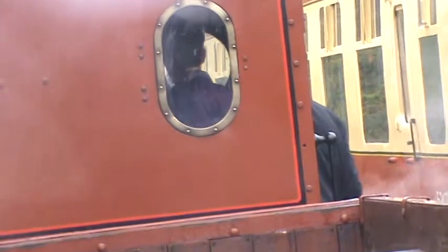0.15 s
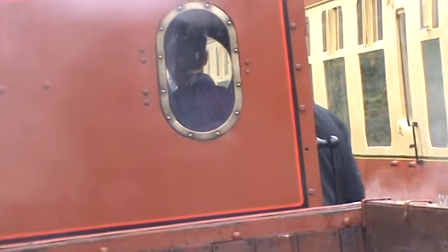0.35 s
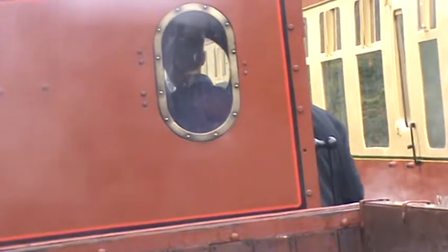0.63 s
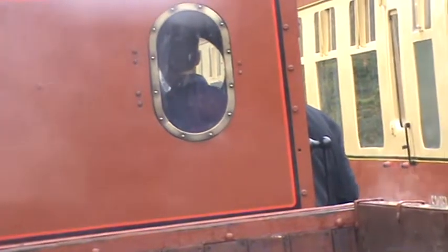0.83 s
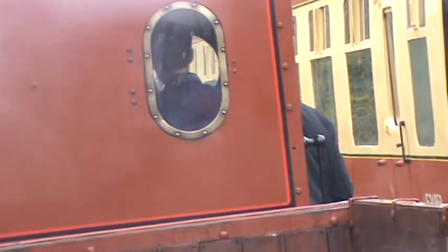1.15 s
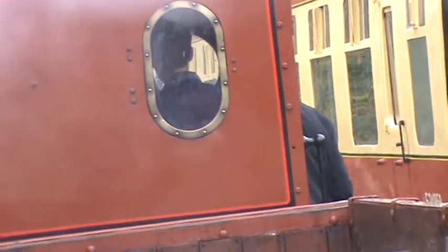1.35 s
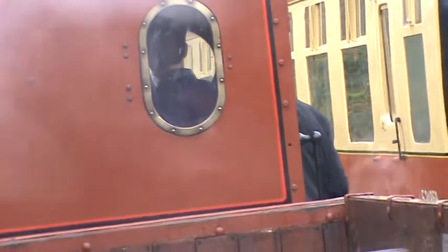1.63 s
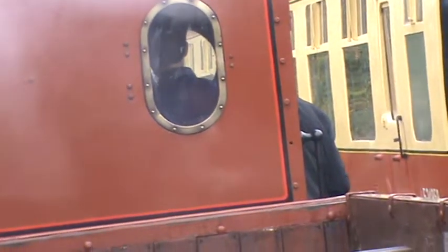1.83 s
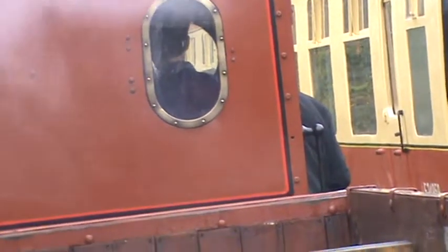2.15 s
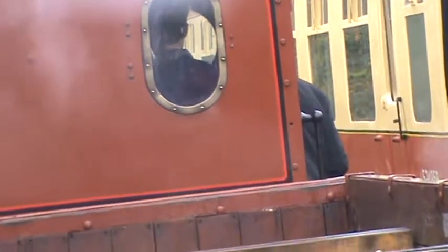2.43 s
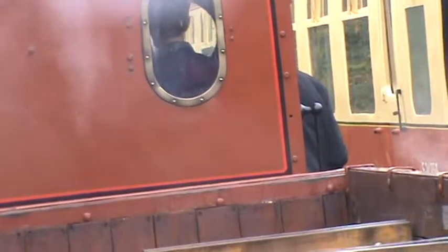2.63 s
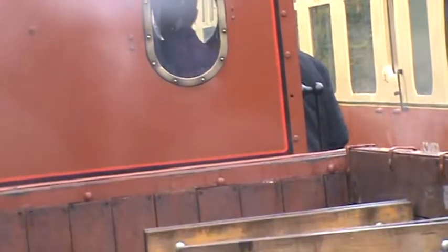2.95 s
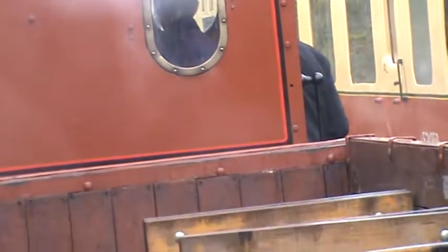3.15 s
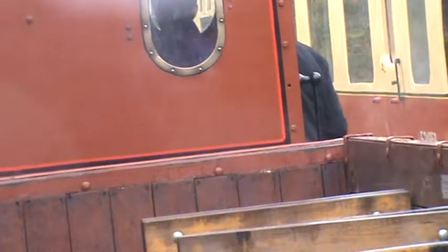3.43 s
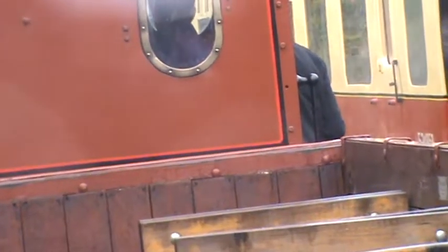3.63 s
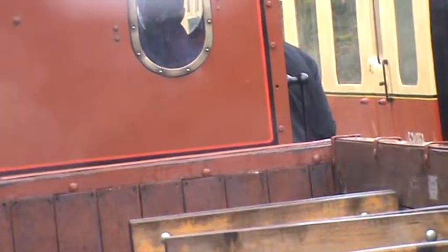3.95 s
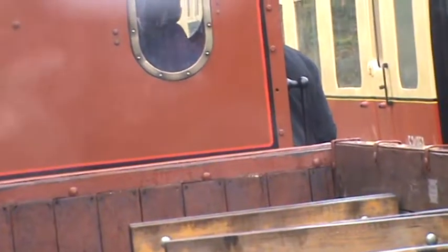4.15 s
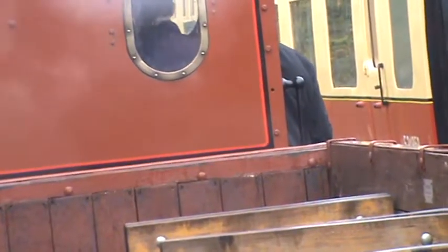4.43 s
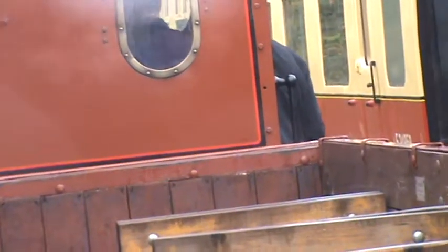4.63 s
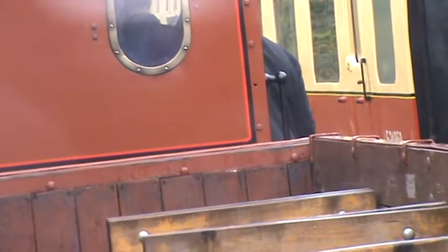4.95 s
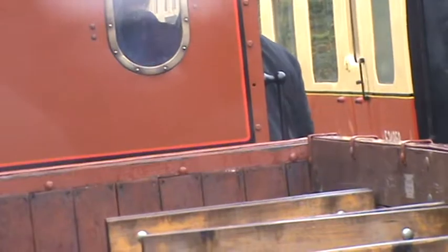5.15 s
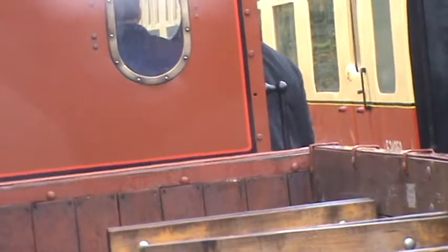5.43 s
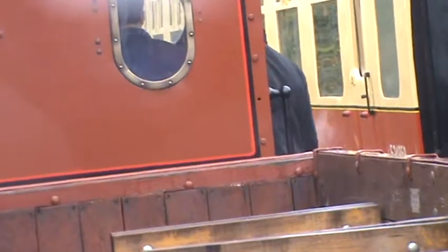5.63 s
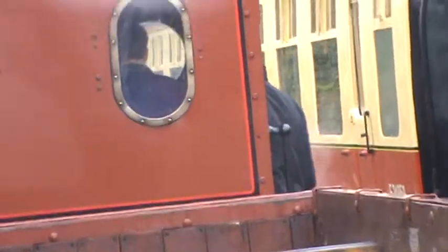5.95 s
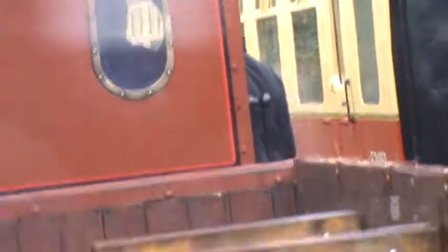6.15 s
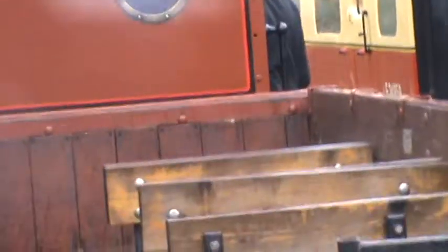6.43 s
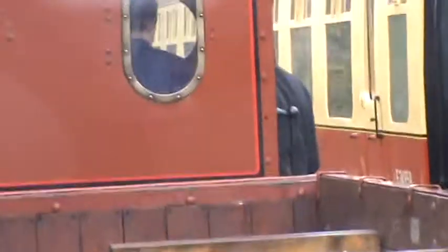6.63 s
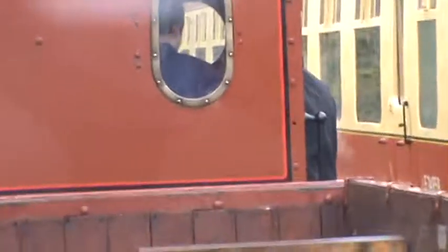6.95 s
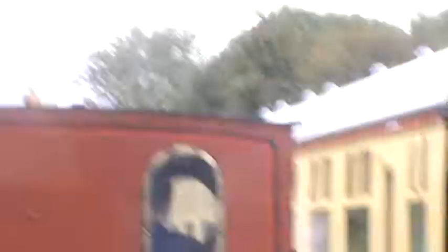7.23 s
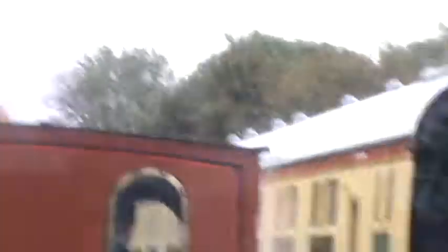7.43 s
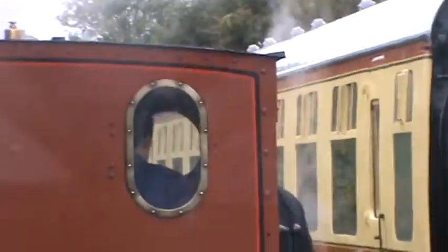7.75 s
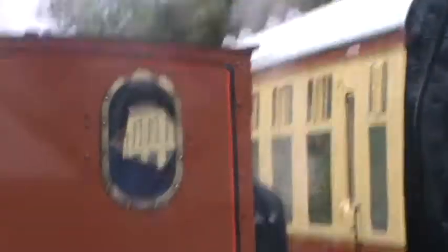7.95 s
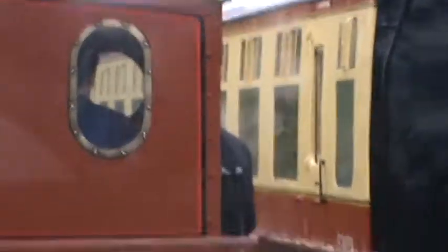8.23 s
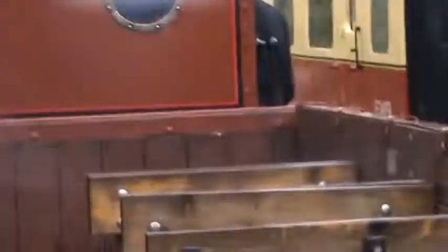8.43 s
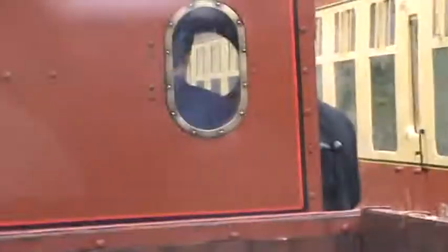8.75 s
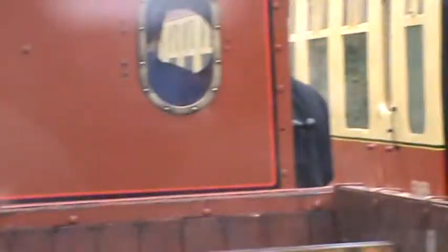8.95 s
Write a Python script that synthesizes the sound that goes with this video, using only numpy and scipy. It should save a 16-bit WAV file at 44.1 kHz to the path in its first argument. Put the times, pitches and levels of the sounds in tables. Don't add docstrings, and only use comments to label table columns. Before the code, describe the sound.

A locomotive blows off steam very close to a hand-held stereo microphone outdoors on a platform. The dense, bright hiss holds from start to end, ringing metallically, with fuzzy high whistling in brief flares. A faint low drone swells underneath. Dull knocks come early on, then again in the later part, the strongest just past seven seconds.

```python
import sys
import numpy as np
from scipy import signal
from scipy.fft import rfft, irfft, next_fast_len
from scipy.io import wavfile
from scipy.ndimage import uniform_filter1d

SR = 44100
rng = np.random.default_rng(int(sys.argv[2]) if len(sys.argv) > 2 else 0)


def voltage_ratio(level):
    return 10 ** (np.asarray(level, float) / 20)


def unload_wav(signal):
    wavfile.write(
        sys.argv[1],
        SR,
        np.round(np.clip(np.atleast_2d(signal).T, -1, 1) * 32767).astype(np.int16),
    )


N = 400869


def evened(x):
    return x / np.sqrt(np.mean(x ** 2) + 1e-20)


def read(points, hz):
    f, value = np.transpose(points)
    return np.interp(np.log(hz + 1), np.log(f + 1), value)


def centred(db):
    return voltage_ratio(db - db.mean())


def resonate(x, hz, width_hz):
    turn = np.exp(2j * np.pi * np.cumsum(hz * np.ones(len(x))) / SR)
    decay = np.exp(-np.pi * width_hz / SR)
    return turn * signal.lfilter([1 - decay], [1, -decay], x / turn)


def narrow_noise(noise, hz, width_hz):
    return resonate(resonate(noise, hz, width_hz), hz, width_hz)


def steadied(z, share):
    return z / (abs(z) + 0.13 * np.std(z)) ** share


def ring_power(modes, hz):
    return sum(voltage_ratio(db) ** 2 / (1 + (2 * (hz - f) / width) ** 2) ** 2 for f, width, db in modes)


# start_s, jet_db, facing_db
JET = [(0, -21.5, -5.5), (.3, -20.5, -3.5), (.75, -20.5, -3.5), (1.25, -21, -4.5), (1.8, -21, -2.5),
       (2.4, -20.5, -3.5), (2.8, -21.5, -3.5), (3.55, -21.5, -4.5), (4.1, -20.5, -3), (4.75, -21, -5),
       (5.1, -22, -2.5), (5.45, -21, -5), (6.0, -21.5, -3), (6.35, -21, -5), (6.9, -21.5, -8.5),
       (7.2, -21, -7.5), (7.5, -20.5, -8.5), (9.09, -21, -6)]
# pitch_hz, level_db (per Hz)
BROAD = [(25, -26), (60, -14.5), (120, -15.5), (220, -15), (400, -34.5), (700, -23.5), (1150, -16.5),
         (1900, -13), (3200, -7.5), (5400, -11.5), (7500, -12.5), (10500, -14.5), (13000, -19),
         (15700, -30)]
# pitch_hz, width_hz, level_db (per Hz at the top)
PIPE = [(326.3, 23.3, -14), (514.4, 9.9, -14), (486, 215, -22.5), (613, 87, -21.5), (796, 27, -7),
        (848.6, 21, -5), (910.4, 24, -6), (940, 100, -13), (1025, 14, -2.5), (1242, 130, -13.5),
        (1466, 85, -4.5), (1544, 18, -9.5), (1578, 344, -9), (1690, 14, -6.5), (1769, 33, -8)]
# pitch_hz, width_hz, level_db (per Hz at the top)
PLATING = [(2018, 94, -7.5), (2134, 30, -4), (2270, 20, -4.5), (2463, 176, -3.5), (2530, 46, -2.5),
           (2606, 41, -1), (2737, 118, -1.5), (2904, 35, -2.5), (3000, 43, -4), (3443, 110, -7),
           (3640, 150, -4.5), (3770, 170, -15), (4090, 660, -7.5), (4080, 70, -2.5), (4540, 36, -15),
           (4540, 780, -6), (4730, 32, -3), (4890, 310, -8), (5097, 420, -10.5), (5770, 109, -20),
           (5960, 322, -16.5)]
# pitch_hz, share
RING_SHARE = [(1300, -0.32), (1470, 0.44), (1650, 0.053), (1900, -0.24), (2300, -0.62), (2450, 1),
              (2800, 0.71), (3000, 0.16), (3200, -0.27), (3550, 0.018), (3850, 0.39), (4100, -0.02)]


def steam_power(t, hz):
    fizz_lag, pipe_lag = 0.86, 1
    fizz_start_db, fizz_build_s = -1.5, 1.6
    pipe_facing = 0.2
    start_s, jet_db, facing_db = np.transpose(JET)
    jet = centred(np.interp(t, start_s, jet_db))
    facing = centred(np.interp(t, start_s, facing_db))
    fizz = centred(fizz_start_db * np.exp(-t / fizz_build_s)) / jet ** fizz_lag
    pipe = facing ** pipe_facing / jet ** pipe_lag
    fizz_share = np.clip((hz - 5000) / 1500, 0, 1)
    broad = voltage_ratio(read(BROAD, hz)) ** 2 * fizz ** (2 * fizz_share)
    power = broad + ring_power(PLATING, hz) + ring_power(PIPE, hz) * pipe ** 2
    power = power * facing ** (2 * read(RING_SHARE, hz))
    return power * jet ** (2 * np.clip(hz / 900, 0, 1))


def standing_waves(frames, bins):
    depth_db = 1.5
    ripple = rng.standard_normal((frames, bins)).T
    ripple = uniform_filter1d(ripple, size=3, axis=0)
    ripple = evened(uniform_filter1d(ripple, size=60, axis=1))
    ripple = ripple - ripple.mean(axis=1, keepdims=True)
    return voltage_ratio(2 * depth_db * ripple)


# pitch_hz, likeness (0-1)
SAME = [(30, .6), (70, .8), (130, .98), (450, .95), (1500, .95), (3000, .94), (4500, .9), (7000, .82),
        (10000, .76), (12500, .79), (14500, .6)]
# pitch_hz, lead_rad
LEAD = [(30, 0.21), (70, 0.35), (130, 0.66), (250, 1.23), (450, 1.37), (900, 1.26), (1500, 1), (2500, 0.59),
        (4500, 0.47), (7000, 0.32), (10000, 0.13), (12500, 0.19), (14500, 0.74), (15600, 0.18)]


def hiss():
    size, hop = 4096, 1024
    frames, bins = N // hop + 5, size // 2 + 1
    hz = np.fft.rfftfreq(size, 1 / SR)[:, None]
    power = steam_power(np.arange(frames) * hop / SR, hz) * standing_waves(frames, bins)
    a, b, c, d = rng.standard_normal((frames, bins, 4)).T
    left, other = a + 1j * b, c + 1j * d
    same = np.clip(read(SAME, hz), 0, 1)
    right = same * left + np.sqrt(1 - same ** 2) * other
    summed = (1 + same * np.cos(read(LEAD, hz))) / 2
    z = np.array([left, right]) * np.sqrt(power / summed)
    return evened(signal.istft(z, nperseg=size, noverlap=size - hop)[1][:, :N])


def turbulence(x, patchy_db=0.5, flutter_db=0.56):
    hz, t, z = signal.stft(x, SR, nperseg=512, noverlap=384)
    patches = rng.standard_normal((len(t), len(hz))).T
    patches = uniform_filter1d(patches, size=7, axis=0)
    patches = evened(uniform_filter1d(patches, size=24, axis=1))
    rates_hz = np.geomspace(5, 40, num=40)
    flutter = evened(sum(np.sin(2 * np.pi * (f * t + rng.random())) for f in rates_hz))
    above_bass = np.clip(hz / 1500, 0, 1)[:, None]
    treble = np.clip((hz - 3500) / 6000, 0, 1)[:, None]
    z = z * voltage_ratio(patchy_db * patches * above_bass + flutter_db * treble * flutter)
    return signal.istft(z, SR, nperseg=512, noverlap=384)[1][:, :N]


def singing(flares, idle_db, hz, width_hz):
    t = np.arange(0, N / SR + .01, .005)
    level = voltage_ratio(idle_db)
    for top_s, length_s, db in flares:
        level = level + voltage_ratio(db - 3) * np.exp(-(2 * (t - top_s) / length_s) ** 2)
    z = narrow_noise(rng.standard_normal(N), hz, width_hz)
    return np.interp(np.arange(N) / SR, t, level) * evened(z.real)


# top_s, length_s, level_db
WHISTLE = [(.1, .25, -23), (.4, .15, -25), (1.4, .6, -31), (2.17, .35, -26), (2.71, .2, -29),
           (3.15, .3, -31), (3.67, .15, -31), (4.18, .3, -29), (4.75, .3, -31), (5.57, .15, -31),
           (6.0, .3, -33), (6.58, .18, -28), (7.05, .25, -32), (7.7, .5, -33), (9.05, .2, -32),
           (8.2, .14, -26), (8.62, .3, -31)]


def valve_whistle():
    return singing(WHISTLE, idle_db=-35.5, hz=3842, width_hz=96)


# top_s, length_s, level_db
GUSTS = [
    (.02, .15, -25),
    (1.8, .2, -27),
    (2.32, .18, -22),
    (2.9, .15, -33),
    (4.12, .2, -27),
    (5.13, .15, -30),
    (6.02, .18, -23.5),
    (8.0, .15, -23),
]


def singing_plating():
    return singing(GUSTS, idle_db=-50, hz=2630, width_hz=390)


# start_s, level_db, t60_s, centre_hz (of the struck part)
KNOCKS = [(1.3, -41, .4, 260), (1.333, -35, .35, 300), (1.36, -28, .4, 150), (1.4, -38, .4, 250),
          (1.497, -37, .3, 230), (5.563, -37, .3, 280), (6.642, -31, .3, 470), (6.682, -33, .25, 480),
          (9.03, -35, .4, 260), (7.163, -26, .15, 330), (7.186, -20, .4, 400), (7.196, -20, .6, 135),
          (7.245, -29, .55, 470)]
# pitch_hz, width_hz, level_db
CARRIAGE = [(85, 40, -3), (165, 25, 0), (236, 45, -4), (294, 40, 0), (400, 60, -6), (497, 49, -3),
            (580, 58, -6), (1090, 400, 2)]


def knocks():
    rise_s, low_cut_hz = 0.008, 60
    reach_db = -5
    push = rng.standard_normal(2 * SR)
    rings = [evened(steadied(narrow_noise(push, hz, width), 0.81).real) for hz, width, _ in CARRIAGE]
    out, t = np.zeros(N + SR), np.arange(SR // 2) / SR
    for k, (start_s, db, t60_s, centre_hz) in enumerate(KNOCKS):
        offset = (k + 1) * SR // 10
        body = 0
        for (hz, _, top_db), ring in zip(CARRIAGE, rings):
            reach = voltage_ratio(top_db + reach_db * np.log2(hz / centre_hz) ** 2)
            body = body + reach * ring[offset:offset + len(t)]
        rise = 1 - np.exp(-(t / rise_s) ** 2)
        start = round(start_s * SR)
        out[start:start + len(t)] += rise * voltage_ratio(db - 60 * t / t60_s) * body
    low_cut = signal.butter(2, low_cut_hz, "high", fs=SR, output="sos")
    return signal.sosfilt(low_cut, out[:N])


# start_s, level_db
DRONE = [(0, -42), (.4, -38.5), (1.4, -34), (2.0, -37.5), (2.4, -35), (3.05, -40), (3.8, -34), (4.5, -38.5),
         (5.3, -34), (6.35, -41), (6.6, -36), (7.0, -35.5), (7.25, -35), (7.6, -38.5), (8.3, -35),
         (9.09, -37.5)]


def drone(hz=157.4, width_hz=24, steady=0.12):
    start_s, db = np.transpose(DRONE)
    z = narrow_noise(rng.standard_normal(N), hz, width_hz)
    z = resonate(steadied(z, steady), hz, 60.)
    return voltage_ratio(np.interp(np.arange(N) / SR, start_s, db)) * evened(z.real)


def scene():
    jet = voltage_ratio(-17) * turbulence(hiss())
    return jet + drone() + knocks() + valve_whistle() + singing_plating()


# pitch_hz, left_minus_right_db
TILT = [(60, 0), (300, .3), (650, .5), (780, 1.5), (900, -4.5), (1050, 0), (1400, 1.5), (3300, 0.9),
        (9000, 1.5), (15000, 0)]


def ports(dry):
    size = next_fast_len(N + 4096)
    hz = np.fft.rfftfreq(size, 1 / SR)
    half = np.sqrt(voltage_ratio(read(TILT, hz)) * np.exp(1j * read(LEAD, hz)))
    return irfft(rfft(dry, size) * np.array([half, 1 / half]), size)[:, :N]


def gain_control(dry):
    dip_db, from_db, recover_s = -1.3, -27, 0.08
    bass = uniform_filter1d(abs(resonate(dry.mean(0), 280., 250.)) ** 2, size=800)
    thump = np.tanh(bass / voltage_ratio(2 * from_db)) ** 2
    pace = 1 / (recover_s * SR)
    held = signal.lfilter([pace], [1, pace - 1], thump)
    return voltage_ratio(dip_db * held / held.max())


def band_limit(x):
    return signal.sosfilt(signal.butter(12, 15750, fs=SR, output="sos"), x)


def record(dry):
    ceiling = 1.3
    mix = ceiling * np.tanh(ports(dry) * gain_control(dry) / ceiling)
    return band_limit(mix)


dry = scene()
out = record(dry)
unload_wav(out)
```